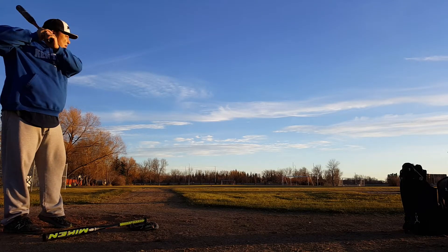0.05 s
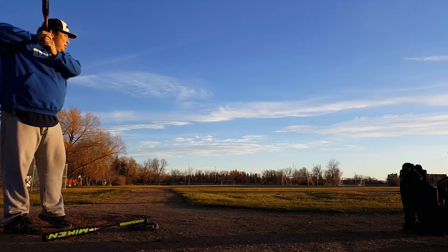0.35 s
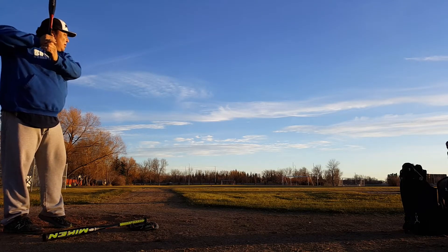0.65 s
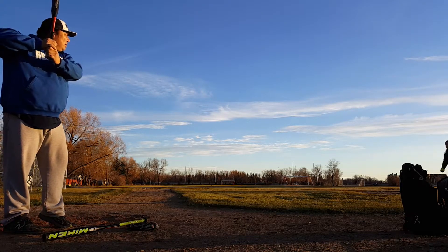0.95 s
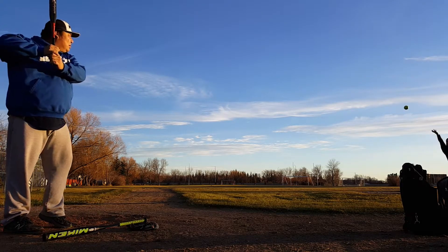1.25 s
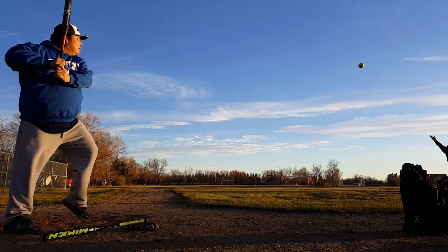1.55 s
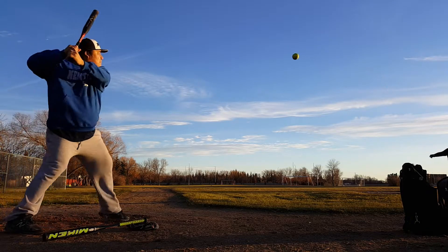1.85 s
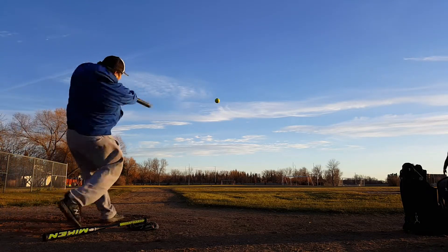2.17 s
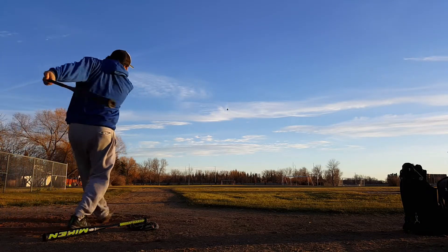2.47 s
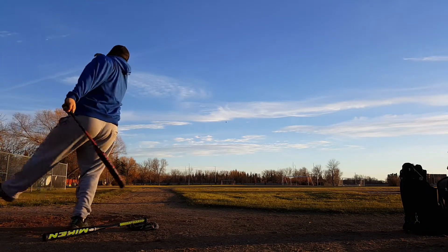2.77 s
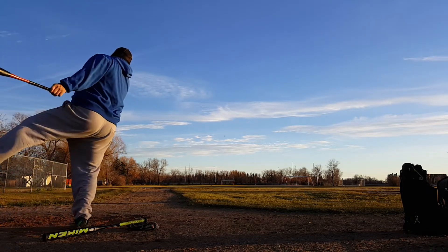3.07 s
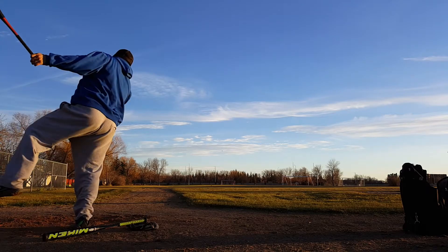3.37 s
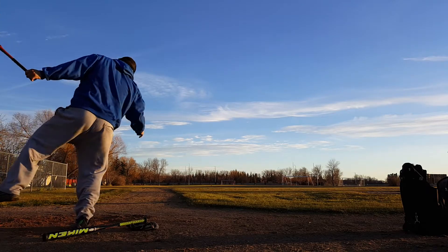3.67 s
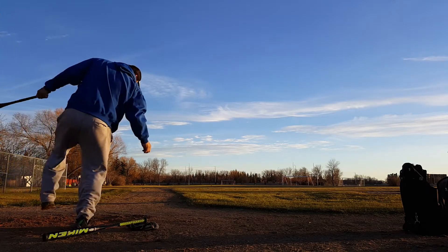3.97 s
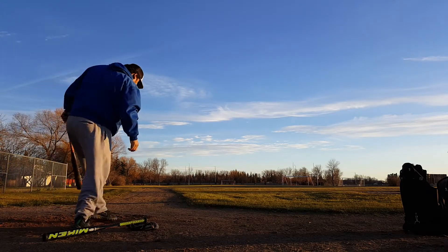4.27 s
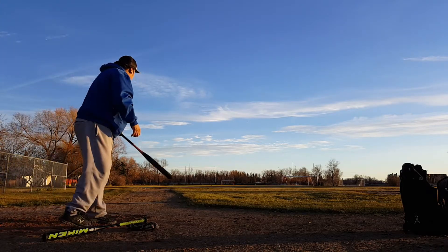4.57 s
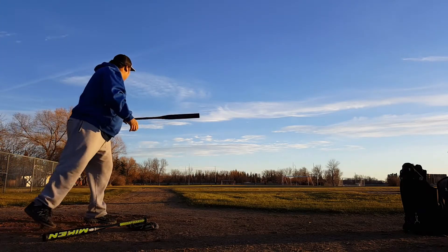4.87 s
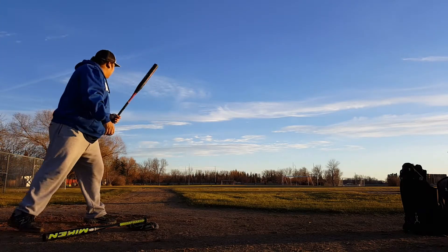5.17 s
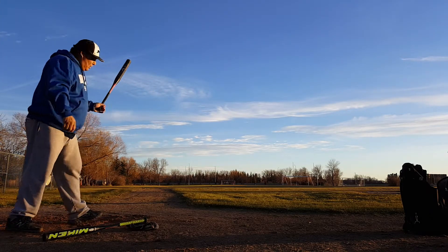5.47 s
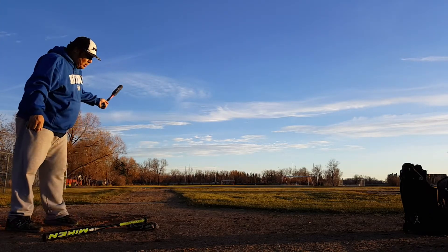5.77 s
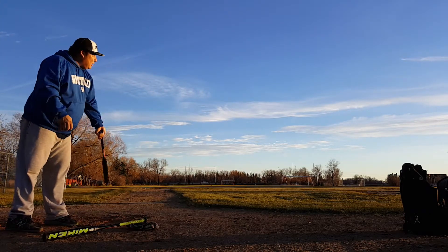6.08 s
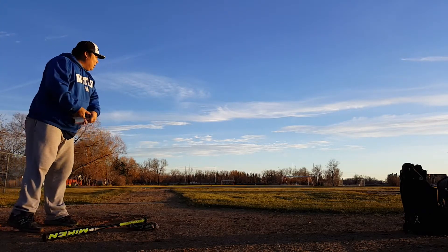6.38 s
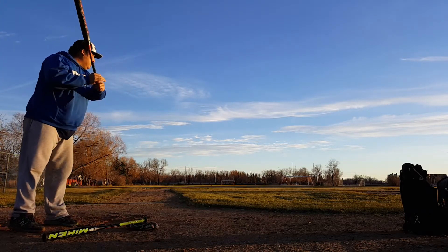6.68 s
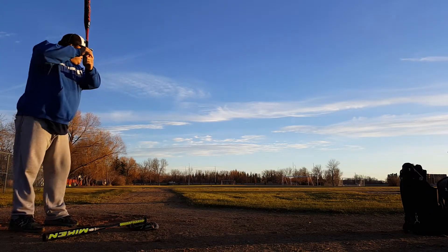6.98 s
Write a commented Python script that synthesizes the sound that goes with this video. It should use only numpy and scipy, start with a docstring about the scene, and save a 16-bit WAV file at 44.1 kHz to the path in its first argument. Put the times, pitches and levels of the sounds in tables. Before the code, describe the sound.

A bat hits a ball with one sharp, ringing crack on an open field, with faint shoe scuffs, light wind and distant traffic.

```python
"""An open dirt field at batting practice: shoes scuff through the swing, the barrel swishes, and a hollow
bat meets the ball with one ringing crack. Fences and trees throw it back; a soft knock and steps follow.
Light wind rumbles throughout, over a wash of far traffic with climbing engine tones and faint whines.
Two spaced microphones overload on the crack, and their gain control ducks the field for a moment."""
import sys
import numpy as np
from scipy import signal
from scipy.fft import rfft, irfft
from scipy.io import wavfile
from scipy.ndimage import minimum_filter1d, map_coordinates

SR = 44100
rng = np.random.default_rng(int(sys.argv[2]) if len(sys.argv) > 2 else 0)


def inscribe(sig):
    """Save sig as 16-bit PCM at rate SR to the path in sys.argv[1].

    A 1-D sig is mono; a 2-D sig holds one channel per row.
    Samples are clipped to [-1, 1] before scaling.
    """
    pcm = np.round(np.clip(np.atleast_2d(sig).T, -1, 1) * 32767)
    wavfile.write(sys.argv[1], SR, pcm.astype(np.int16))


N = 310023
HIT_S = 2.1657  # bat meets ball


def bat(ring_db=-1.0, rise_s=0.00039, crack_db=-10.5, crack_t60=.038, snap_db=-11.5, snap_t60=.05):
    """The ball rings the barrel under a burst of noise, whose bright snap differs at each microphone."""
    # body and bright edge of the contact noise: f/Hz, level/dB
    crack_colour = [(50, -22), (120, -14), (260, -15), (400, -1), (700, -3.5), (1300, -0.5), (3000, -9.5),
                    (8000, -22), (16000, -35.5)]
    snap_colour = [(500, -20.5), (2000, -5), (4200, -2.5), (6500, 0.5), (8600, 4.5), (10500, -6.5),
                   (16000, -2.5)]
    ring = from_db(ring_db) * barrel(HIT_S)
    crack = from_db(crack_db) * dying(HIT_S, crack_t60) * noise(crack_colour, channels=1)[0]
    snap = from_db(snap_db) * dying(HIT_S, snap_t60) * noise(snap_colour)
    return (two_mics(ring + crack, lead_ms=.031) + snap) * attack(HIT_S, rise_s)


def barrel(start):
    """A blow sets the hollow bat ringing in decaying modes of alternating polarity."""
    # modes of barrel and ball: f/Hz, level/dB, t60/s
    modes = [(470, -13, 0.035), (964, -1.5, .088), (1125, 1.5, .019), (1271, 3, 0.0229), (1472, -5, 0.028),
             (1908, -11, .07), (2020, -11, .05), (2460, -12.5, 0.055), (2560, -6.5, 0.036),
             (2610, -16.5, 0.03), (2834, -9, 0.083), (2895, -12.5, .08), (2840, -40.5, 0.8),
             (2930, -39, .65), (3730, -8.5, .036), (4710, -8.5, .05), (4862, -6.5, .05), (4877, -47, .6),
             (5763, -10, .035), (6770, -14.5, .035), (7520, -15, 0.074), (8470, -8.5, 0.046),
             (8690, -15, .04), (9400, -14, 0.039)]
    age = np.arange(SR) / SR
    ringing = 0
    for k, (hz, db, t60) in enumerate(modes):
        decay = from_db(db) * np.exp(-np.log(1000) * age / t60)
        ringing += (-1) ** k * decay * np.sin(2 * np.pi * hz * age)
    return np.pad(ringing, (round(start * SR), N))[:N]


def thud(hz=110.0, t60=0.075, left_db=-12.0, right_db=-28.0):
    """The blow's low push, stronger on the batter's side."""
    push = dying(HIT_S, t60) * np.sin(2 * np.pi * hz * (seconds() - HIT_S))
    return from_db([[left_db], [right_db]]) * push


def swish(db=-38.0, rise_s=.018):
    """Air rushes round the barrel as it speeds up into the ball."""
    # rushing air: f/Hz, level/dB
    air_colour = [(80, -5.5), (300, -0.5), (700, -1), (1400, -3), (2400, -11.5), (4000, -29.5),
                  (10000, -45)]
    until_hit = HIT_S - seconds()
    rush = (until_hit > 0) * np.exp(-np.abs(until_hit) / rise_s)
    return from_db(db) * rush * noise(air_colour, channels=1)


def knock(start_s=2.7965, db=-34.5):
    """A soft contact in the follow-through wakes mostly the barrel's middle modes."""
    # dulling by the soft contact: f/Hz, gain/dB
    soft_contact = [(300, -10), (1000, -11), (1800, -7), (2900, -2), (3800, -9), (4700, -30), (9000, -46)]
    return from_db(db) * coloured(barrel(start_s), soft_contact)


def field_echoes(tail_db=-27.5, tail_t60=0.74, build_s=0.033):
    """Rough fences and ground smear the crack into noise bursts; a thin tail follows from the trees."""
    # slaps off ground, fence and far objects: delay/s, spread/s, level/dB
    echoes = [(.009, .004, -16), (.021, .003, -18.5), (.029, .004, -13.5), (.042, .005, -23.5),
              (.069, .0035, -25), (.086, .008, -32.5), (0.104, 0.0044, -36.5), (.185, 0.0086, -41.5)]
    # colour of the slaps and of the tail: f/Hz, level/dB
    echo_colour = [(100, -4.5), (450, -2.5), (750, -4), (1300, -0.5), (2000, 3.5), (3000, -3.5), (4000, -9),
                   (6000, -14), (8200, -11.5), (10500, -25.5), (15000, -29)]
    tail_colour = [(100, -2.5), (500, -3.5), (1000, -0.5), (1600, 1.5), (2200, 6), (2700, -4.5), (2950, 6),
                   (3400, -7), (4000, -3.5), (4650, -10.5), (4880, -4.5), (5150, -11.5), (6300, -15.5),
                   (8300, -13.5), (10000, -27), (15000, -33.5)]
    age = np.maximum(seconds() - HIT_S, 0)
    slaps = (age > 0) * sum(from_db(db) * bump(HIT_S + delay, spread) for delay, spread, db in echoes)
    tail = from_db(tail_db) * dying(HIT_S, tail_t60) * (1 - np.exp(-(age / build_s) ** 2))
    return slaps * noise(echo_colour) + tail * noise(tail_colour)


def scuffs(grain_db=3.0, grain_hz=250):
    """Soles drag over dirt in strokes that swell and fade: a dull rub and bright grit, both grainy."""
    # strokes of shoes and cloth: peak t/s, spread/s, level/dB, share of grit/0-1
    strokes = [(1.872, 0.016, -65, 0), (1.95, .065, -64, .5), (2.078, .021, -48, .37),
               (2.16, 0.021, -53.5, 0.89), (2.868, 0.044, -59, 0.15), (4.362, .024, -66.5, .1),
               (4.442, 0.029, -65, .15), (4.54, .048, -68.5, 0.1), (5.285, .12, -72.5, .6),
               (5.688, .016, -72, .45), (6.578, .015, -75, .8)]
    # rubbing sole and sliding grit: f/Hz, level/dB
    sole_colour = [(300, -9.5), (1200, 1.5), (2500, -2), (4200, 1), (6000, -9), (9000, -24.5), (16000, -39)]
    grit_colour = [(1000, -9.5), (2500, -3.5), (4200, 0), (6300, -6.5), (8700, 0), (10500, -15.5),
                   (16000, -21.5)]
    rub, grit = 0, 0
    for peak_s, spread, db, share in strokes:
        stroke = from_db(db) * bump(peak_s, spread)
        rub += np.sqrt(1 - share) * stroke
        grit += np.sqrt(share) * stroke
    friction = rub * noise(sole_colour) + grit * noise(grit_colour)
    return friction * from_db(grain_db * drift(grain_hz))


def taps(relative_width=0.51, rise_s=0.00046):
    """Heels tap and grit snaps, each a short burst of noise in one broad resonance."""
    # taps and snaps: t/s, level/dB, centre f/Hz, t60/s
    contacts = [(2.667, -40, 1402, 0.094), (2.797, -38, 1796, 0.036), (3.142, -65.5, 5000, .02),
                (4.289, -47, 2800, 0.011), (4.305, -46.5, 3650, 0.0075), (4.341, -44, 2200, 0.026),
                (4.3425, -47, 5310, 0.0064), (4.442, -45.5, 4720, 0.0076)]
    white = rng.standard_normal((2, N))
    out = 0
    for start, db, hz, t60 in contacts:
        width_hz = relative_width * hz
        body = rms_one(resonance(resonance(white, hz, width_hz), hz, width_hz))
        out += from_db(db) * dying(start, t60) * attack(start, rise_s) * body
    return out


def wind(breeze_db=-45, eddy_db=-13.0, flutter_db=1.0):
    """A breeze rumbles on both microphones alike, with small separate eddies at each."""
    # wind rumble: f/Hz, level/dB
    rumble_colour = [(10, -34), (22, -24.5), (35, -14.5), (55, 2.5), (85, 2), (120, 1), (170, -3.5),
                     (215, -4.5), (280, -18.5), (380, -17.5), (600, -35), (1200, -53.5), (8000, -110)]
    # the breeze freshens: start t/s, length/s, rise/dB
    gusts = [(.15, 2.6, 2.0), (3.45, 1.2, 2.5)]
    gust_db = sum(db * swell(start, length) for start, length, db in gusts)
    strength = from_db(breeze_db + gust_db + flutter_db * drift(6.0))
    rumble = noise(rumble_colour, channels=1)
    eddies = from_db(eddy_db) * noise(rumble_colour)
    return strength * (rumble + eddies)


def traffic(start_db=-49, rise_db_per_s=0.1):
    """Road wash arrives from both ends of the field and slowly draws nearer."""
    # far roads: f/Hz, level/dB
    road_colour = [(100, -3.5), (250, 4), (420, -1.5), (510, 0.5), (640, -3), (850, 2.33), (1150, 2.5),
                   (1400, 1.35), (1650, -0.9), (2200, -8.5), (2700, -14), (3300, -22), (4500, -33.5),
                   (7000, -46.5)]
    # where each road lies: lead of the left microphone/ms, level/dB
    bearings = [(-.38, -4), (0.47, -5.5), (-.28, -9.5), (.2, -9.5), (.05, -11.5)]
    roads = noise(road_colour, channels=len(bearings))
    wash = sum(from_db(db) * two_mics(road, lead_ms) for road, (lead_ms, db) in zip(roads, bearings))
    return from_db(start_db + rise_db_per_s * seconds()) * rms_one(wash)


def motors(throttle_s=.15, waver_db=1.13, waver_hz=.5):
    """Only the tones of far engines carry: each climbs through a pull, wavering in the moving air."""
    # pulls in one gear: start t/s, length/s, f/Hz, climb/(Hz/s), level/dB, swell/(dB/s)
    pulls = [(-.2, 7.5, 150.3, 1.25, -50, -0.31), (-.2, 0.86, 76.7, 1.4, -49, -2),
             (0.503, 3.6, 86.05, 3.03, -47.5, -0.04), (.9, 2.17, 366.7, 1.0, -62.5, 0.1),
             (3.98, 0.36, 98, 41.3, -41, 4), (4.298, 3.0, 69.2, 5.2, -46.5, 1.5)]
    # brief swells of all the tones: start t/s, length/s, rise/dB
    surges = [(5.5, 0.51, 3.5), (6.447, .27, 2.5), (6.854, 0.16, 6.5)]
    tones = 0
    for start, length, hz, climb, db, db_per_s in pulls:
        age = np.clip(seconds() - start, 0, length)
        throttle = np.clip(np.minimum(age, length - age) / throttle_s, 0, 1)
        phase = 2 * np.pi * np.cumsum(hz + climb * age + waver_hz * drift(8)) / SR
        tones += throttle * from_db(db + db_per_s * age + waver_db * drift(9)) * np.sin(phase)
    surge_db = sum(db * swell(start, length) for start, length, db in surges)
    return np.sqrt(2) * tones * from_db(surge_db)


def whines():
    """Faint far-off whines: narrow bands of noise that swell and fade."""
    # whines: start t/s, length/s, f/Hz, level/dB
    cues = [(5.152, 0.45, 517, -56.5), (5.949, 0.49, 1157, -60), (6.065, 0.11, 1113, -50.5)]
    out = 0
    for start, length, hz, db in cues:
        band = [(hz / 2, -60), (0.964 * hz, -15), (hz, 0), (1.013 * hz, -15), (2 * hz, -70)]
        out += from_db(db) * swell(start, length) * noise(band, channels=1)
    return out


def hiss(db=-73.5):
    """Each microphone adds its own steady noise floor."""
    # microphone hiss: f/Hz, level/dB
    hiss_colour = [(1000, 2), (4500, 1.5), (6500, 0), (8500, 0), (10000, -4), (12500, 0.5), (15500, 2.5)]
    return from_db(db) * noise(hiss_colour)


def from_db(db):
    """Decibels to gain."""
    return 10 ** (np.asarray(db) / 20)


def rms_one(x):
    """Scale to unit rms."""
    return x / np.sqrt(np.mean(x ** 2) + 1e-20)


def seconds():
    """Time of every sample."""
    return np.arange(N) / SR


def coloured(x, spectrum, size=2048):
    """Minimum-phase EQ through points of f/Hz, gain/dB."""
    hz, db = np.transpose(spectrum)
    grid = np.maximum(np.fft.rfftfreq(4 * size, 1 / SR), 1)
    gain = from_db(np.interp(np.log(grid), np.log(hz), db))
    cepstrum = irfft(np.log(gain))
    folded = np.r_[cepstrum[0], 2 * cepstrum[1:2 * size]]
    response = irfft(np.exp(rfft(folded, len(cepstrum))))
    return signal.oaconvolve(np.atleast_2d(x), response[None], axes=1)[:, :x.shape[-1]]


def noise(spectrum, channels=2):
    """Unrelated noise per channel with the given colour; rms 1."""
    return rms_one(coloured(rng.standard_normal((channels, N)), spectrum))


def drift(rate_hz):
    """Random wander between points of spread 1."""
    knots = rng.standard_normal(2000)
    return np.interp(seconds() * rate_hz, np.arange(len(knots)), knots)


def resonance(x, hz, width_hz):
    """Two-pole band-pass."""
    r = np.exp(-np.pi * width_hz / SR)
    return signal.lfilter([1, 0, -1], [1, -2 * r * np.cos(2 * np.pi * hz / SR), r * r], x)


def attack(start, rise_s):
    """Envelope that rises from 0 and settles at 1."""
    return 1 - np.exp(-np.maximum(seconds() - start, 0) / rise_s)


def dying(start, t60):
    """Envelope that jumps to 1 and dies away."""
    age = seconds() - start
    return (age >= 0) * np.exp(-np.log(1000) * np.clip(age / t60, 0, 10))


def swell(start, length):
    """Envelope that rises and falls as half a sine."""
    return np.sin(np.pi * np.clip((seconds() - start) / length, 0, 1))


def bump(peak_s, spread):
    """Bell-shaped envelope."""
    return np.exp(-.5 * np.minimum(np.abs(seconds() - peak_s) / spread, 10) ** 2)


def two_mics(x, lead_ms):
    """A plane wave reaches the left microphone first, or the right if the lead is negative."""
    lag = lead_ms * SR / 1000
    return np.array([x, map_coordinates(x, [np.arange(N) - lag], order=3, mode="nearest")])


def gain_control(x, threshold_db=-8.0, depth_db=12.0, attack_s=0.023, hold_s=0.55, release_s=0.24):
    """A loud peak pulls the gain down; it is held there, then creeps back."""
    peak_db = 20 * np.log10(np.abs(x).max(axis=0) + 1e-9)
    over_db = np.clip(peak_db - threshold_db, 1e-6, depth_db)
    hold = 2 * int(hold_s * SR / 2) + 1
    held_db = -minimum_filter1d(-over_db, hold, origin=hold // 2, mode="nearest")
    fall = seconds() / release_s
    released_db = np.exp(np.maximum.accumulate(np.log(held_db) + fall) - fall)
    pole = np.exp(-1 / (attack_s * SR))
    duck_db = signal.lfilter([1 - pole], [1, -pole], released_db)
    return x * from_db(-duck_db)


def scene():
    """The batter stands a little left of the microphones, over a bed of wind and traffic."""
    pan_left = from_db([[.5], [-.5]])
    batter = swish() + bat() * pan_left + thud() + knock() + scuffs() + taps()
    return batter + field_echoes() + wind() + traffic() + whines() + motors() + hiss()


def record(dry, ceiling=.89, low_cut_hz=36.0, top_cut_hz=15800):
    """Gain control, overload on the first milliseconds of the crack, low cut and top cut."""
    ducked = gain_control(dry)
    clipped = ducked / (1 + (ducked / ceiling) ** 6) ** (1 / 6)
    low_cut = signal.butter(2, low_cut_hz, "high", fs=SR, output="sos")
    top_cut = signal.ellip(12, .1, 90, top_cut_hz, fs=SR, output="sos")
    return signal.sosfilt(top_cut, signal.sosfilt(low_cut, clipped))


dry = scene()
out = record(dry)
inscribe(out)
```